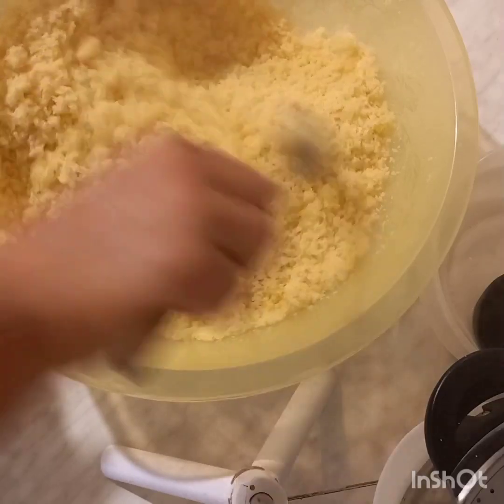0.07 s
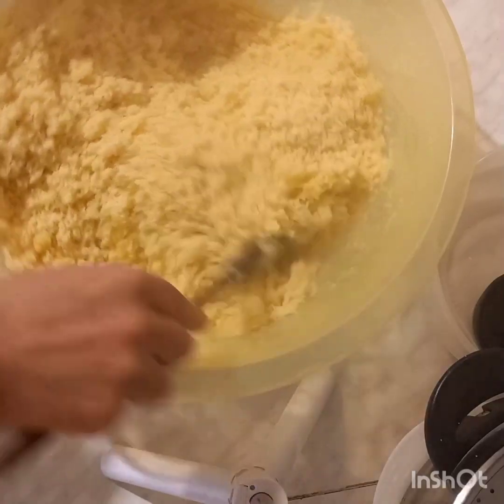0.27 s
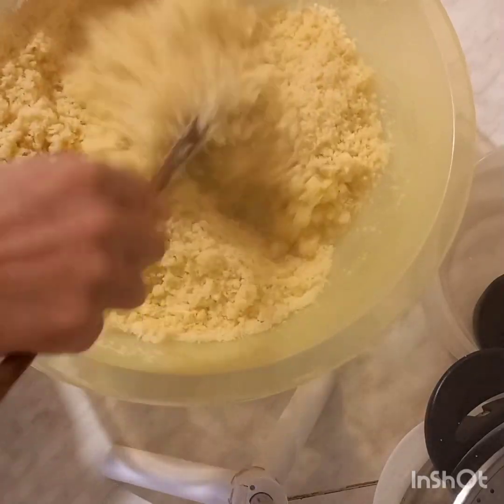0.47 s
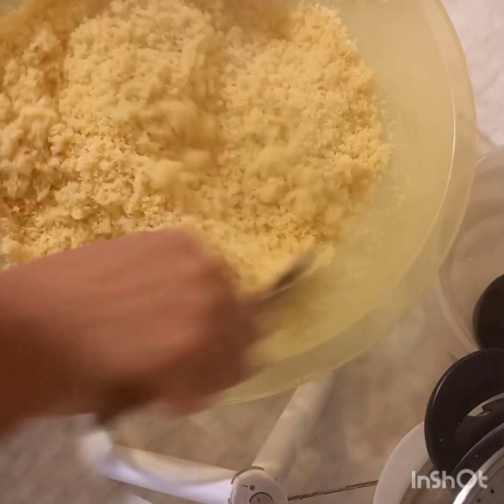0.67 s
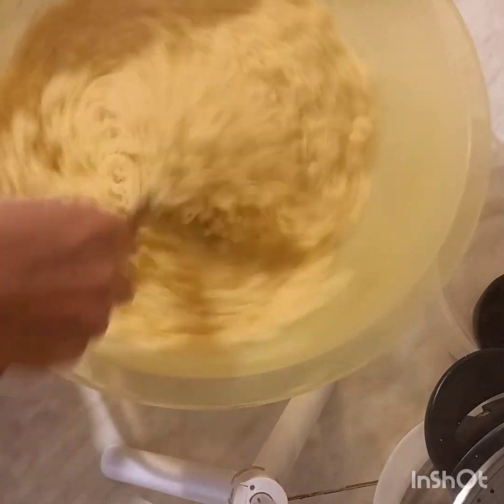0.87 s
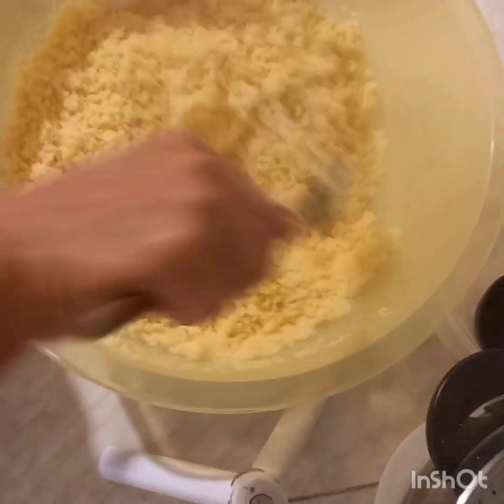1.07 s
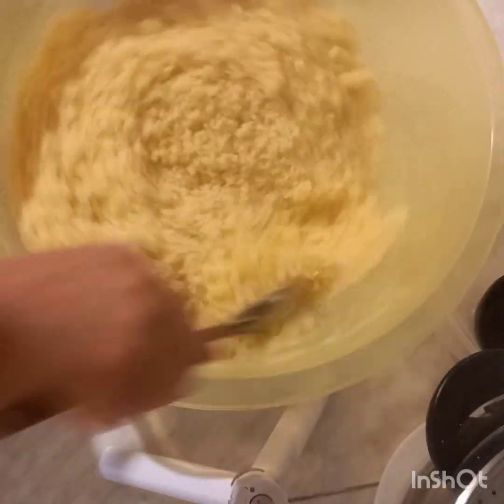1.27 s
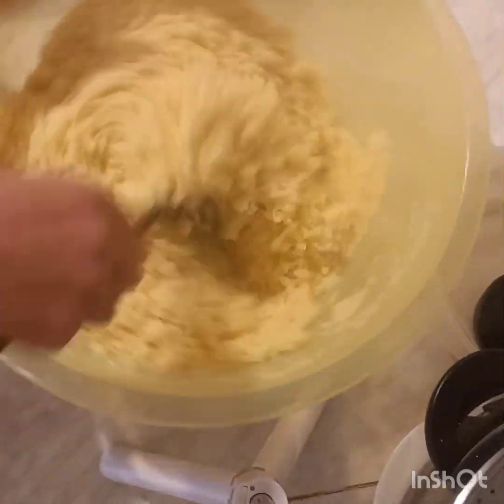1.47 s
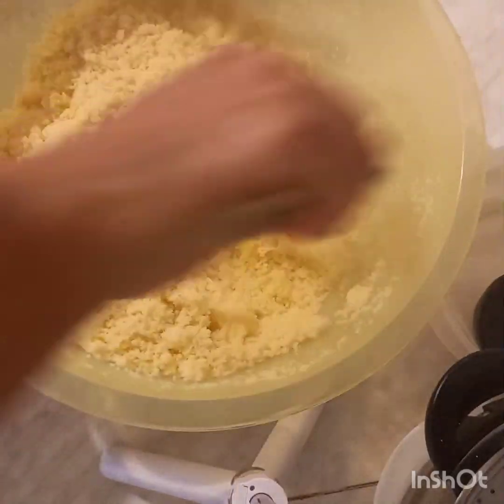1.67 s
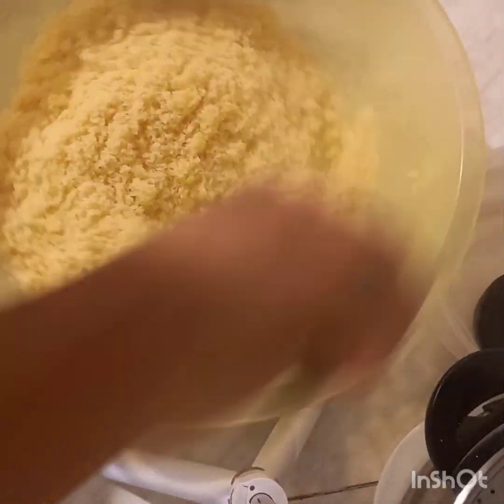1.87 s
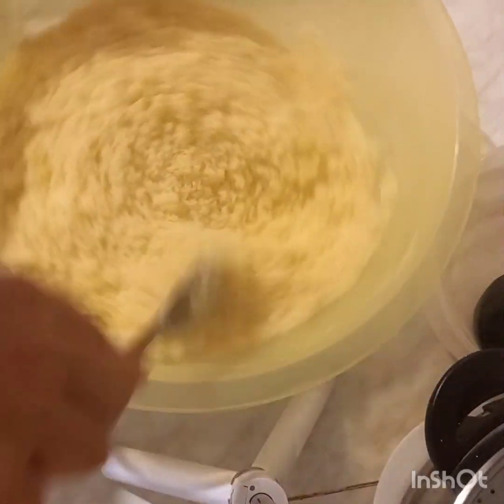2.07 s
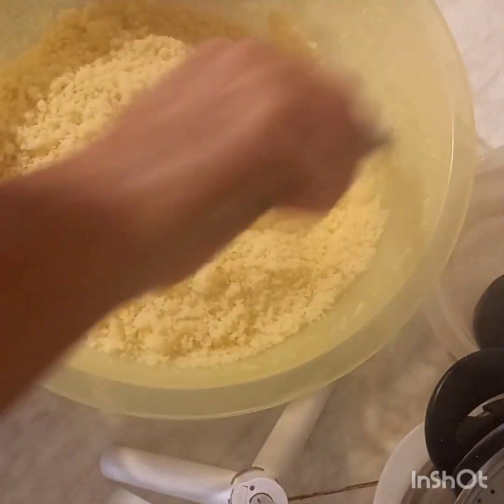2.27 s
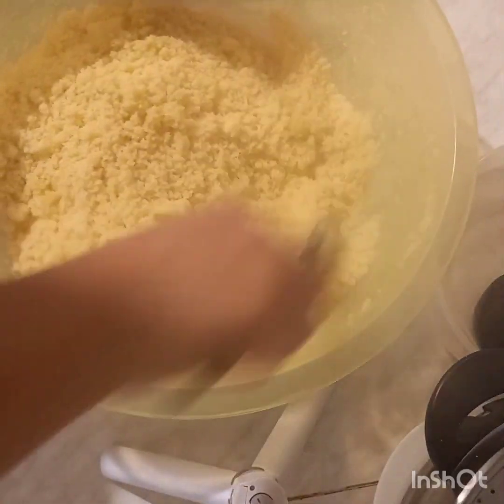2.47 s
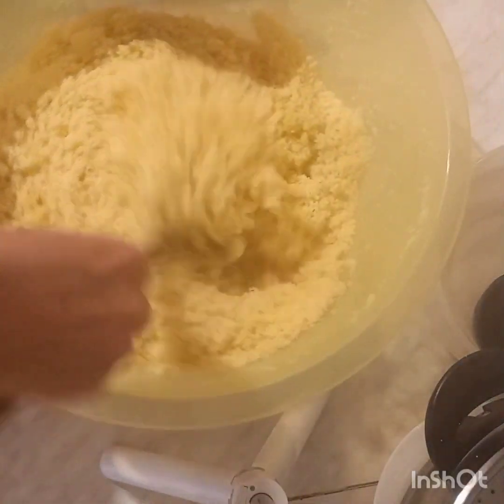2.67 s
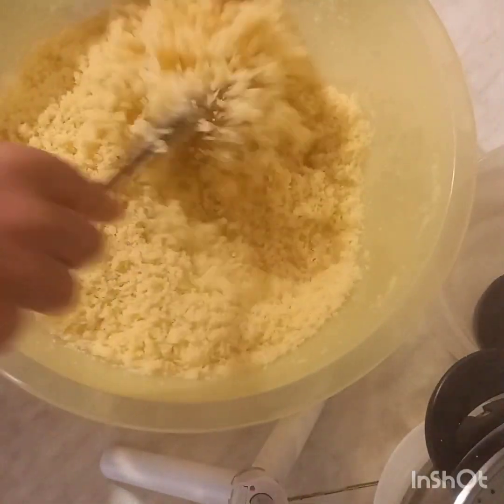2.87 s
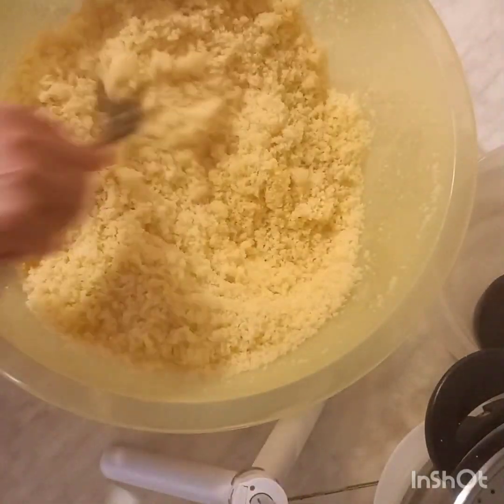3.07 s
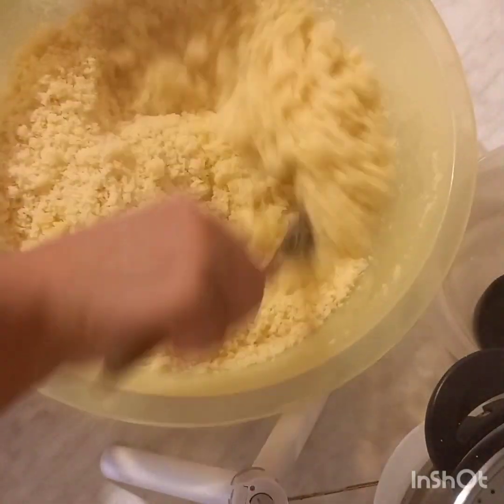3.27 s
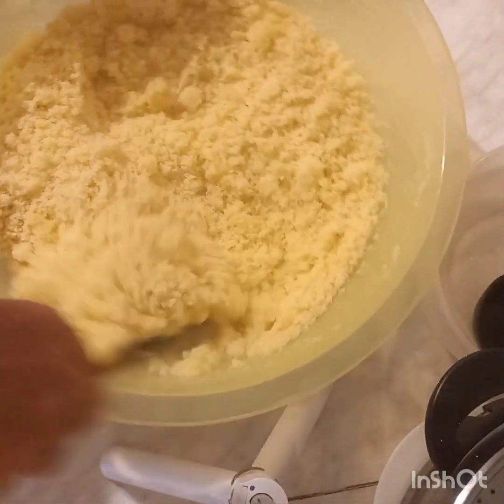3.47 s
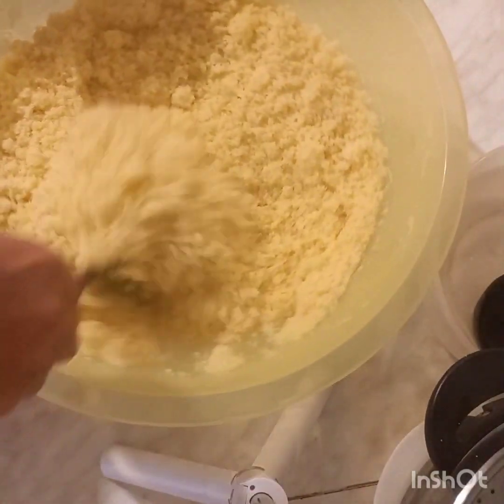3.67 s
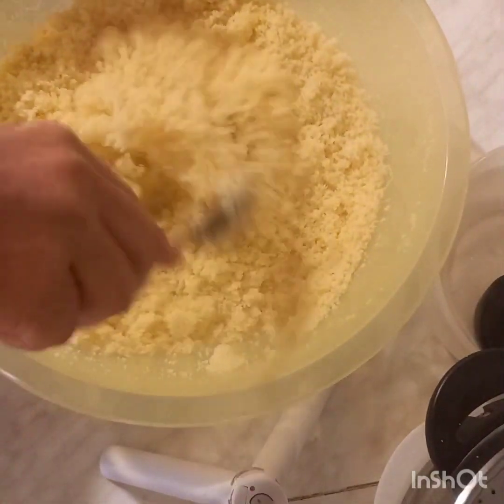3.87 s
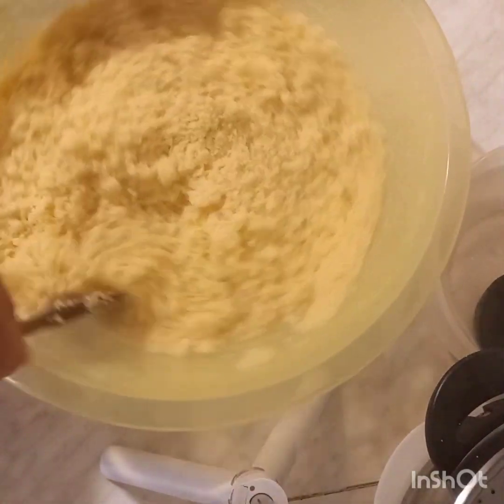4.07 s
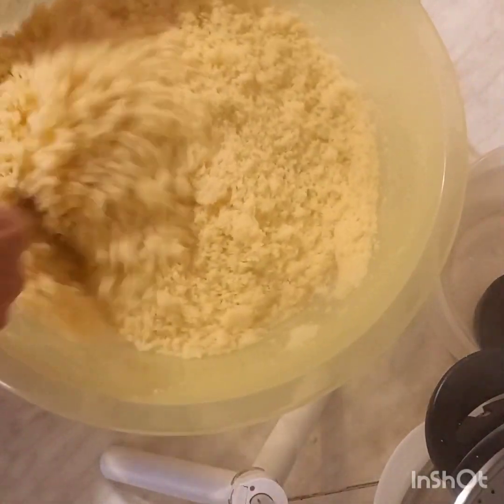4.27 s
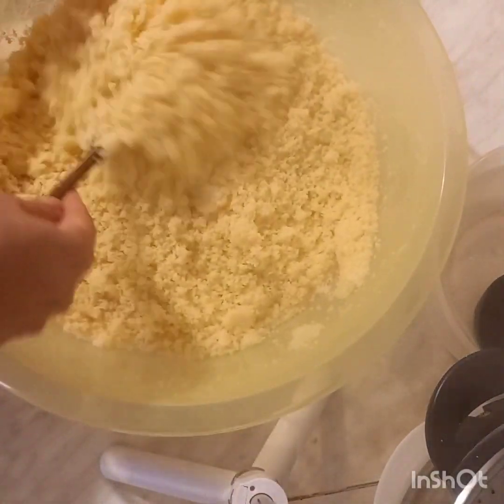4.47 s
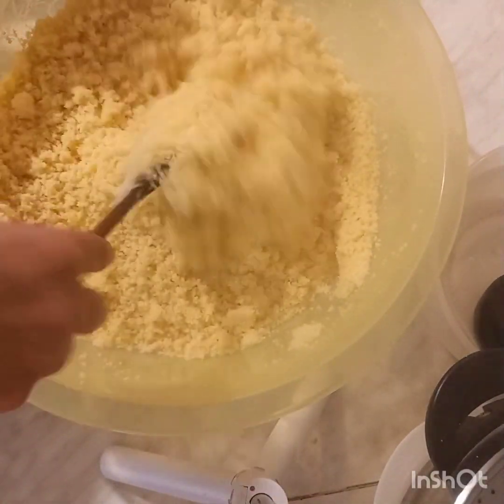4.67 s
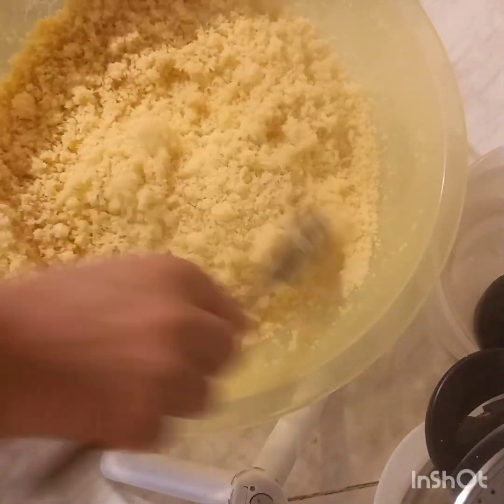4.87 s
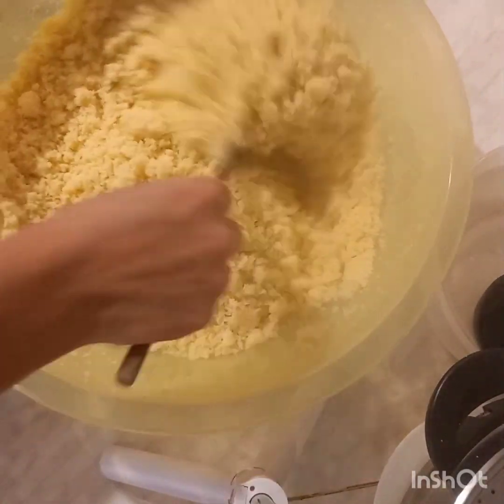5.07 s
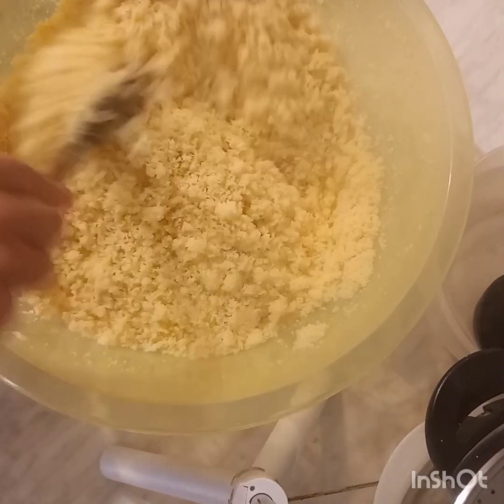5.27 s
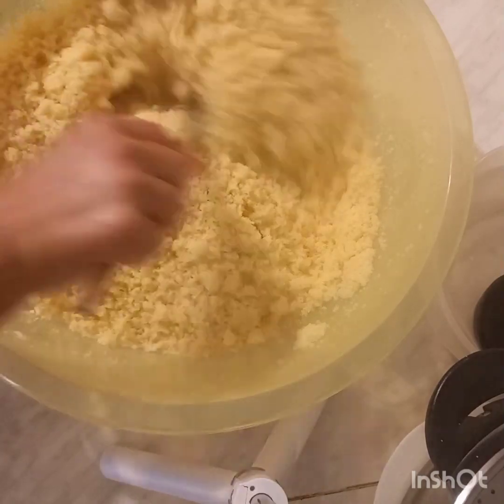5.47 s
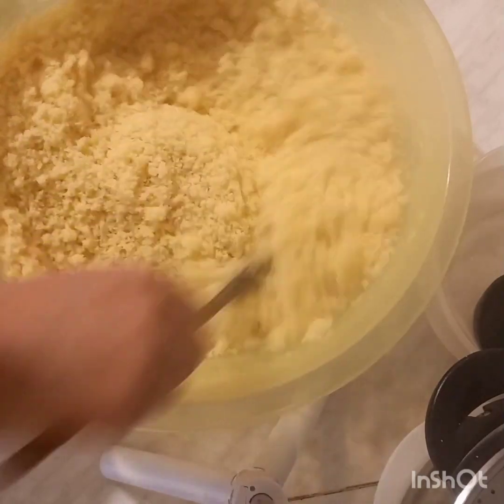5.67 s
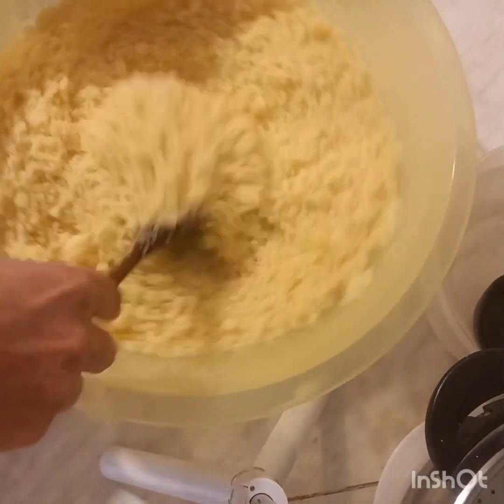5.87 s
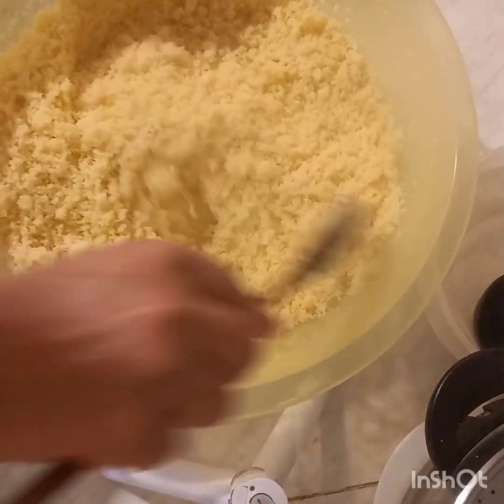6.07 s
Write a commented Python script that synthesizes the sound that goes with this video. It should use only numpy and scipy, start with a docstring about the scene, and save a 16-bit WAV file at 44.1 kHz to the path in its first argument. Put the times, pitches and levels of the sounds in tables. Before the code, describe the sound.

Grains rustle and slide over plastic as a wooden spoon works through them in quick, uneven strokes. Hollow knocks against the bowl come about twice a second at first, then grow more muffled while the scraping goes on. A grain clicks now and then, and the pushed bowl gives a low, soft rumble. It is all heard up close in a small, faintly humming kitchen.

```python
"""A wooden spoon stirs couscous in a wide plastic bowl, close by, in a small kitchen.
The spoon knocks the bowl as it dips in, then ploughs through the grains, whose countless tiny hits
make a rustle as they slide over the plastic. Now and then the spoon rubs the wall or a grain clicks.
The pushed bowl rumbles on its stand, and the room hums faintly."""
import sys
import numpy as np
from scipy import signal
from scipy.fft import rfft, irfft, next_fast_len
from scipy.io import wavfile
from scipy.ndimage import map_coordinates

SR = 44100
rng = np.random.default_rng(int(sys.argv[2]) if len(sys.argv) > 2 else 0)


def generate_wav(signal):
    """Clip the signal to [-1, 1] and save it as 16-bit WAV at the path in sys.argv[1]."""
    frames = np.transpose(np.atleast_2d(signal))
    scaled = np.clip(frames, -1, 1) * 32767
    pcm = np.round(scaled).astype(np.int16)
    wavfile.write(sys.argv[1], SR, pcm)


N = 269451


def amp(db):
    """Turn decibels into a gain to multiply by."""
    return 10 ** (np.asarray(db) / 20)


def unit(x):
    """Scale a sound to an average strength (rms) of 1."""
    return x / np.sqrt(np.mean(x ** 2) + 1e-20)


def along(points, hz):
    """Read a value between (frequency, value) points, on a log frequency axis."""
    freqs, values = np.transpose(points)
    return np.interp(np.log(hz + 1), np.log(freqs + 1), values)


def wobble(rate):
    """A smooth curve through `rate` random points a second."""
    points = rng.standard_normal(int(N * rate / SR) + 4)
    return map_coordinates(points, [np.arange(N) * rate / SR])


def filtered(x, response):
    """Turn each frequency up or down by the gain response(hz)."""
    n = x.shape[-1]
    padded = next_fast_len(n + 8192)
    return irfft(rfft(x, padded) * response(np.fft.rfftfreq(padded, 1 / SR)), padded)[..., :n]


def band(x, low_hz, high_hz):
    """Keep the part of a sound between two frequencies."""
    return signal.sosfilt(signal.butter(2, [low_hz, high_hz], 'band', fs=SR, output='sos'), x)


def add(track, start, sound):
    """Mix a sound into the track at `start` seconds."""
    part = track[..., max(round(start * SR), 0):][..., :sound.shape[-1]]
    part += sound[..., :part.shape[-1]]


def together(gains):
    """The joint gain of unrelated sounds: their powers add up."""
    return np.sqrt(sum(gain ** 2 for gain in gains))


def arch(start, rise, fall, db, depth_db=20):
    """Gain of one movement: from depth_db below its peak it swells to db, then fades."""
    since_peak = np.arange(N) / SR - start - rise
    away = np.maximum(-since_peak / rise, since_peak / fall)
    return amp(db - depth_db * np.minimum(away, 4) ** 2.26)  # a higher power gives a flatter top


def spread(pair, spectrum_db):
    """Turn two unrelated signals into left and right: alike in the bass, unrelated in the treble."""
    # how alike the two ears are: (frequency [Hz], likeness [0-1])
    likeness = [(100, 0.94), (300, 0.53), (700, 0.54), (1400, 0), (3000, 0.09), (6000, 0), (15000, 0)]

    def response(hz):
        angle = np.arccos(along(likeness, hz)) / 2
        return amp(spectrum_db(hz)) * np.array([np.cos(angle), np.sin(angle)])
    mid, side = filtered(pair, response)
    return np.array([mid + side, mid - side])


def coloured(pair, spectrum, peaks=()):
    """Stereo sound of strength 1 with a broad tone colour and narrow peaks on top."""
    def lift_db(hz):
        return sum(db / (1 + (2 * (hz - centre) / width) ** 2) for centre, width, db in peaks)
    return unit(spread(pair, lambda hz: along(spectrum, hz) + lift_db(hz)))


def kitchen_hum():
    """Faint, steady room noise with a few humming bands."""
    # tone colour of the noise: (frequency [Hz], relative level [dB])
    spectrum = [(100, -1.5), (250, -2), (400, -0.5), (900, -2.5), (1400, -6), (2400, -9.5), (2700, -14.5),
                (3300, -18.5), (3900, -16.5), (5000, -20.5), (6500, -29), (8500, -24), (12000, -22.5),
                (15500, -29)]
    # humming bands: (frequency [Hz], width [Hz], boost [dB])
    hum_bands = [(487.7, 20, 9), (965, 13, 14.5), (2438, 110, 8), (3680, 34, 10.5), (4070, 300, 8.5)]
    return amp(-63) * coloured(rng.standard_normal((2, N)), spectrum, hum_bands)


def kitchen_echo(x):
    """The room's short echo; each frequency dies away at its own speed."""
    # how long the echo lasts: (frequency [Hz], time to fade by 60 dB [s])
    fade_times = [(100, 0.36), (500, 0.37), (1200, 0.39), (5000, 0.38), (14000, 0.4)]
    # tone colour of the echo: (frequency [Hz], level [dB])
    spectrum = [(60, -2.5), (130, -1.5), (250, -3.5), (700, -3), (2000, -3.5), (14000, -2)]
    hz, t, noise = signal.stft(rng.standard_normal((2, SR // 2)), SR, nperseg=256)
    fade = amp(-60 * t / along(fade_times, hz)[:, None])
    tail = signal.istft(noise * fade, SR, nperseg=256)[1]
    tail = spread(tail / np.linalg.norm(tail[0]), lambda f: along(spectrum, f))
    delayed = np.pad(x, (SR // 300, 0))
    return signal.fftconvolve(delayed[None], tail, axes=1)[:, :N]


def near_echoes(pair, gain, count=8):
    """Nearby surfaces add weak copies of the sound at each ear within 30 ms."""
    echoes = np.zeros((2, int(0.03 * SR)))
    echoes[:, 0] = 1  # the direct sound
    for ear in echoes:
        ear[rng.integers(SR // 400, len(ear), count)] = gain * rng.choice([-1, 1], count)
    return unit(signal.fftconvolve(pair, echoes, axes=1)[:, :N])


def bowl_rumble(effort_db):
    """The pushed bowl sways and rocks on its stand, and its base drones under the dragging spoon."""
    # the bowl rocks: (start [s], building up [s], dying down [s], level [dB])
    rocks = [(0.24, .08, .08, -53), (0.68, .1, .13, -51), (1.78, .06, 0.073, -54), (3.02, 0.16, .2, -55.5),
             (3.74, .14, 0.086, -56), (4.42, 0.26, 0.152, -52.5), (4.94, 0.098, 0.206, -50),
             (5.15, 0.25, 0.15, -51), (5.5, 0.082, 0.091, -53), (5.73, 0.087, 0.113, -54)]
    # tone colour of the swaying bowl: (frequency [Hz], relative level [dB])
    sway_spectrum = [(20, -33), (38, -27), (48, 3), (56, 17), (64, -2), (80, -19), (140, -61)]
    # tone colour of the droning base: (frequency [Hz], relative level [dB])
    drone_spectrum = [(60, -36), (85, 0), (110, 2.5), (150, 0), (190, -16.5), (260, -13), (500, -42.5)]
    sway_gain = together([amp(-63.5 + 0.18 * effort_db)] + [arch(*rock) for rock in rocks])
    sway = sway_gain * coloured(rng.standard_normal((2, N)), sway_spectrum)
    drone = amp(-56 + 0.27 * effort_db) * coloured(rng.standard_normal((2, N)), drone_spectrum)
    return sway + drone


def grain_ticks():
    """A few hard, dry grains click against the plastic."""
    # single grains hitting the wall: (time [s], level [dB], pitch [Hz])
    ticks = [(2.073, -39, 2500), (2.088, -26, 2650), (3.56, -37.5, 7830)]
    t = np.arange(SR // 50) / SR
    out = np.zeros(N)
    for start, db, hz in ticks:
        fade = amp(db - 60 * t * hz / 9)  # 60 dB down after nine vibrations
        add(out, start, fade * np.sin(2 * np.pi * hz * t))
    return out


def spoon_rubs():
    """The spoon sticks and slips on the bare wall in short, faint rasps."""
    # wood dragging on plastic: (start [s], length [s], pitch [Hz], width [Hz], level [dB])
    rubs = [(0.237, 0.027, 763, 60.4, -62), (1.696, 0.083, 1160, 306, -59.5), (2.02, 0.094, 477.6, 49, -49),
            (2.07, 0.09, 238, 70, -54), (3.035, 0.09, 274, 60, -63.5), (4.42, 0.029, 2950, 600, -65),
            (4.434, 0.082, 455, 120, -67), (4.655, .16, 3637, 100, -75), (4.949, .11, 362, 202, -57.5),
            (5.331, 0.08, 1250, 161, -65.5), (5.409, 0.09, 357, 158, -58)]
    out = np.zeros(N)
    for start, length, hz, width, db in rubs:
        n = int(length * SR)
        noise = band(rng.standard_normal(2 * n), hz - width / 2, hz + width / 2)
        rasp = unit(noise[n:])  # by the second half the filter has settled
        add(out, start, amp(db) * rasp * signal.windows.tukey(n, 0.5))
    return out


def unit_start(x):
    """Scale a hit so that its first 25 ms have a strength of 1."""
    return x / np.sqrt(np.mean(x[:SR // 40] ** 2))


def ring(tones, t, attack_s, longest_s=1):
    """Part of the struck bowl rings with fading tones, in a slightly new balance at every hit."""
    sound = np.zeros(len(t))
    for hz, db, fade_s in tones:
        fade = amp(db + rng.normal(0, 1.8) - 60 * t / min(fade_s, longest_s))
        sound += fade * np.sin(2 * np.pi * hz * t)
    return unit_start(sound * (1 - np.exp(-t / attack_s)))


def burst(t, low_hz, high_hz, fade_s):
    """The instant of contact: a band of noise that fades by 60 dB in fade_s."""
    noise = rng.standard_normal(len(t)) * amp(-60 * t / fade_s)
    return unit_start(band(noise, low_hz, high_hz))


def spoon_knocks():
    """Where and how hard the spoon lands decides which parts of the bowl ring."""
    # spoon hits, with a relative level for each part: (time [s], base [dB], wall [dB], hollow [dB],
    # clack [dB], crack [dB], longest base ring [s], base pitch [Hz], treble limit [Hz])
    knocks = [(0.164, -41.5, -37, -44.5, -45.5, -54, 0.13, 109, 1900),
              (0.29, -57.5, -50.5, -39.5, -55.5, -54.5, 0.12, 113, 12000),
              (0.652, -37, -32, -36, -29.5, -40.5, 0.13, 111.6, 15000),
              (1.202, -37, -33.5, -42, -41, -49, 0.066, 115, 2380),
              (1.789, -43, -56, -58, -69, -64, 0.45, 111, 2200),
              (2.352, -37.5, -44, -47.5, -46, -59.5, 0.42, 111, 1820),
              (3.109, -49, -48.5, -54, -60.5, -81, 0.3, 92.3, 607),
              (3.133, -43, -55, -70, -80, -80, 0.3, 91, 300),
              (3.507, -47, -56.5, -37, -49, -69, 0.14, 111.4, 1810),
              (3.863, -63, -88.5, -55.5, -63, -78, 0.2, 94, 5000),
              (4.425, -46.5, -56, -55.5, -74, -82, 0.073, 94, 620),
              (4.949, -53.5, -56, -82, -70, -78, 0.24, 110.5, 400),
              (5.415, -44, -47.5, -47.5, -60.5, -74.5, 0.077, 100, 1100)]
    # the bowl's own tones, from its deep base to its bright clack, each table:
    # (pitch [Hz], relative level [dB], time to fade by 60 dB [s])
    base_tones = [(89.4, -22, 0.31), (110, 8, 0.22), (146, 1.5, 0.091)]
    wall_tones = [(235.2, 5.5, 0.054), (277.5, -6.5, 0.067)]
    hollow_tones = [(470.5, 2, 0.074), (528, 1.5, 0.053), (680, -9, 0.0152), (696, 3.5, 0.032),
                    (779, 7.5, 0.034), (888, 3, 0.031)]
    clack_tones = [(1015, 1.5, 0.039), (1053, 0, 0.019), (1145, 2, 0.027), (1290, -20, 0.016),
                   (1457, -9, 0.049)]
    main_hz = base_tones[1][0]
    t = np.arange(SR // 2) / SR
    out = np.zeros(N)
    for start, base_db, wall_db, hollow_db, clack_db, crack_db, ring_s, base_hz, limit_hz in knocks:
        # grains heaped on the base lower its pitch
        loaded = [(hz * base_hz / main_hz, db, fade_s) for hz, db, fade_s in base_tones]
        blow = np.zeros(len(t))
        # base and wall start a moment after the contact
        add(blow, 0.0035, amp(base_db + 1.5) * ring(loaded, t, attack_s=0.0043, longest_s=ring_s))
        add(blow, 0.002, -amp(wall_db - 1) * ring(wall_tones, t, attack_s=0.0016))
        blow += amp(hollow_db) * ring(hollow_tones, t, attack_s=0.0009)
        blow += amp(clack_db - 0.5) * ring(clack_tones, t, attack_s=0.000855)
        wood_crack = burst(t, 1220, 3300, fade_s=0.041)
        plastic_snap = amp(-7.5) * burst(t, 3800, 13450, fade_s=0.024)
        blow += amp(crack_db + 0.41) * (wood_crack + plastic_snap)
        # a hit cushioned by grains loses its treble
        cushion = signal.butter(4, limit_hz, fs=SR, output='sos')
        add(out, start, signal.sosfilt(cushion, blow))
    return out


def heap_slumps():
    """Gain of the sudden slides of grains: a sharp start that runs out."""
    # a heap gives way or lands: (time [s], level [dB], time to fade by 60 dB [s])
    slumps = [(2.023, -38.5, 0.12), (2.074, -38, 0.23), (3.875, -66, .1), (4.982, -51.5, 0.18)]
    t = np.arange(SR // 4) / SR
    gain = np.zeros(N)
    for start, db, fade_s in slumps:
        add(gain, start, amp(db - 60 * t / fade_s))
    return gain


def spoon_strokes():
    """Levels in dB of the scrape on the plastic and the fizz of loose grains as the spoon goes round."""
    # sweeps through the grains:
    # (start [s], speeding up [s], slowing down [s], scrape level [dB], fizz relative to scrape [dB])
    strokes = [(0.079, .218, 0.21, -50, -10), (0.438, 0.0842, 0.42, -65, -11), (0.7, 0.22, .235, -42.8, -6),
               (0.87, 0.052, .11, -45, -10), (1.088, 0.042, 0.12, -54, -5),
               (1.207, .196, 0.2281, -42.5, -5), (1.645, .095, 0.14, -63, -7.5),
               (1.863, 0.19, .19, -42.5, -5.5), (2.223, 0.37, 0.22, -59, -10.5),
               (2.629, 0.1114, 0.2, -53.5, -11), (3.061, 0.13, 0.31, -65.5, -8.5),
               (3.243, 0.37, .17, -53.5, -10.5), (3.824, 0.047, 0.2, -63.5, -3),
               (4.04, .125, .225, -46.3, -8.2), (4.291, 0.14, 0.218, -67, -4),
               (4.954, 0.052, .135, -55, -8.5), (5.29, .134, 0.18, -68.5, -10),
               (5.6, 0.11, 0.083, -58.5, -14), (5.66, 0.23, 0.11, -47.8, -9.5)]
    scrape = together(arch(start, rise, fall, db) for start, rise, fall, db, _ in strokes)
    # loose grains fly only while the spoon is fast, so the fizz swells and fades more steeply
    fizz = together(arch(start, rise, fall, db + fizz_db, depth_db=25.5)
                    for start, rise, fall, db, fizz_db in strokes)
    # the heap never quite rests
    scrape = np.hypot(scrape, amp(-73.5))
    fizz = np.hypot(fizz, amp(-80.5))
    return 20 * np.log10(scrape), 20 * np.log10(fizz)


def grains(per_second, scatter_db, hiss):
    """Tiny hits of uneven size over the hiss of countless smaller ones."""
    hits = rng.random((2, N)) < per_second / SR
    sizes = amp(scatter_db * rng.standard_normal((2, N))) * rng.choice([-1, 1], (2, N))
    return unit(hits * sizes / np.sqrt(per_second)) + hiss * rng.standard_normal((2, N))


def stirring(scrape_db, fizz_db, effort_db):
    """A faster spoon moves more grains; clumps give way unevenly, so the rustle flickers."""
    # tone colours of sliding grains and of loose grains: (frequency [Hz], relative level [dB])
    scrape_spectrum = [(90, -48), (180, -26), (235, -13.5), (320, -11.5), (470, -9.5), (580, -7), (770, -3),
                       (1200, -5), (1950, -3.5), (3200, -7), (4700, -11.5), (6200, -23), (9000, -49.5)]
    fizz_spectrum = [(3000, -21), (5000, -5), (6600, -7), (8200, -2.5), (9600, -6.5), (11300, -4.5),
                     (13500, -9), (15700, -13.5)]
    # steady narrow peaks that colour the rustle of the sliding grains:
    # (frequency [Hz], width [Hz], boost [dB])
    rustle_peaks = [(467, 48, 5.5), (738, 127, 4), (1336, 5.9, 7), (1452.5, 12, 5), (1840, 23, 3),
                    (1940, 53, 5), (2110, 66, 3.5), (2280, 46, 1.5), (2796, 53, 3)]
    per_second = 1000 + 5000 * amp(effort_db)
    clumps_db = 0.7 * wobble(28) + 0.7 * wobble(110)
    sliding = near_echoes(grains(per_second, scatter_db=3, hiss=0.98), gain=0.088)
    scrape = coloured(sliding, scrape_spectrum, rustle_peaks)
    loose = near_echoes(grains(per_second, scatter_db=0.5, hiss=1.8), gain=0.153)
    fizz = coloured(loose, fizz_spectrum)
    # grains driven faster over the plastic sound brighter
    treble = filtered(scrape, lambda hz: 1 - 1 / (1 + (hz / 2900) ** 4))
    scrape += (amp(1.6 + 0.26 * effort_db) - 1) * treble
    # light strokes only shift the top of the heap and hardly reach the plastic
    contact = 1 / (1 + amp(2 * (-73 - scrape_db)))
    scrape_gain = np.hypot(contact * amp(scrape_db + clumps_db + 2.5), heap_slumps())
    fizz_gain = amp(fizz_db + clumps_db / 2 - 0.4)
    return scrape_gain * scrape + fizz_gain * fizz


def scene():
    """Spoon, bowl and grains over the kitchen's hum."""
    scrape_db, fizz_db = spoon_strokes()
    effort_db = scrape_db - scrape_db.max()  # 0 at the hardest stroke
    contacts = spoon_knocks() + spoon_rubs() + grain_ticks()
    hum = kitchen_hum()
    echo = amp(-0.5) * kitchen_echo(contacts)
    return hum + echo + contacts + stirring(scrape_db, fizz_db, effort_db) + bowl_rumble(effort_db)


def record(dry, top_hz=15750):
    """The microphone favours left or right a little by frequency and keeps nothing above top_hz."""
    # the microphone's balance: (frequency [Hz], left minus right [dB])
    balance = [(140, -2), (330, -0.85), (1000, -0.5), (1800, 1.12), (4200, 0), (6400, -2), (9800, 3),
               (15000, 3)]
    return filtered(dry, lambda hz: amp(np.outer([1, -1], along(balance, hz)) / 2) * (hz < top_hz))


dry = scene()
out = record(dry)
generate_wav(out)
```